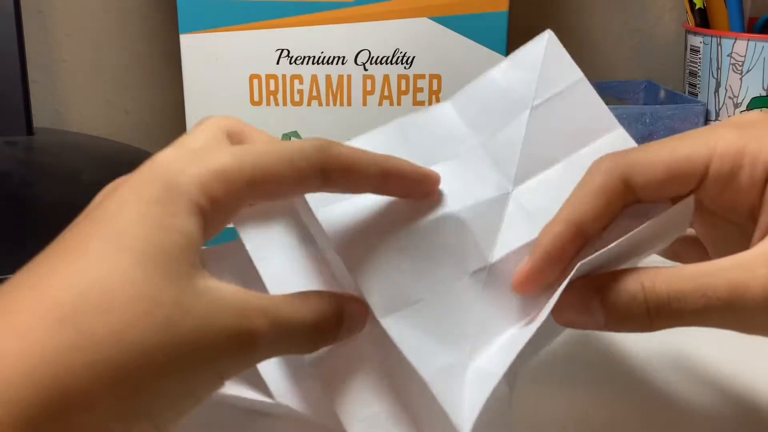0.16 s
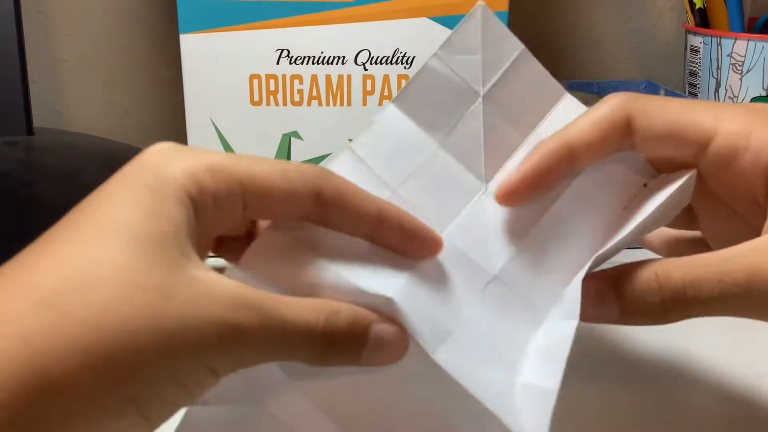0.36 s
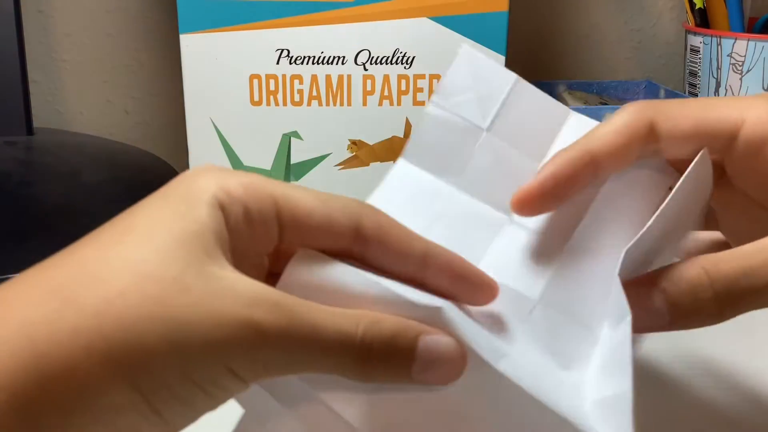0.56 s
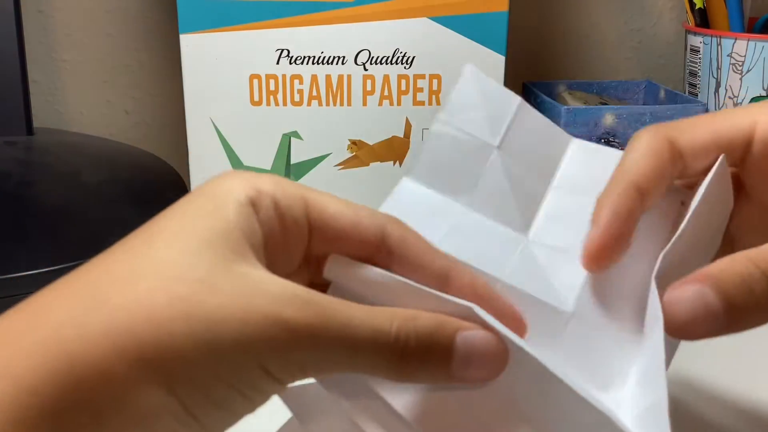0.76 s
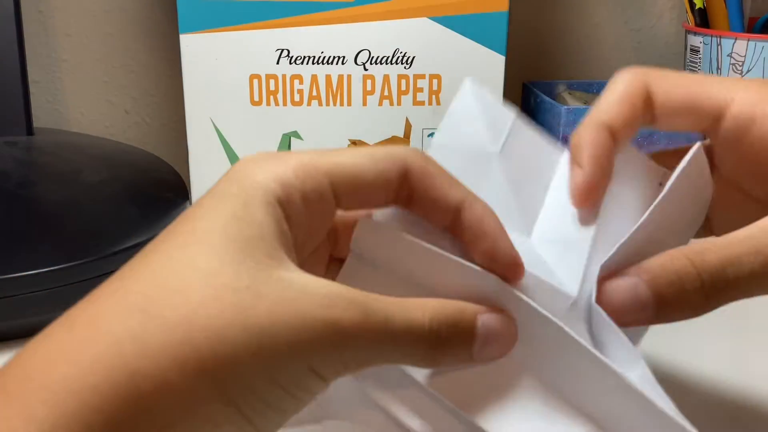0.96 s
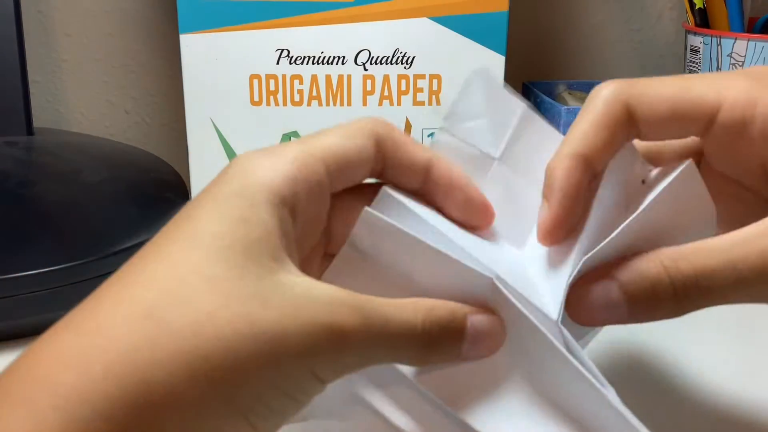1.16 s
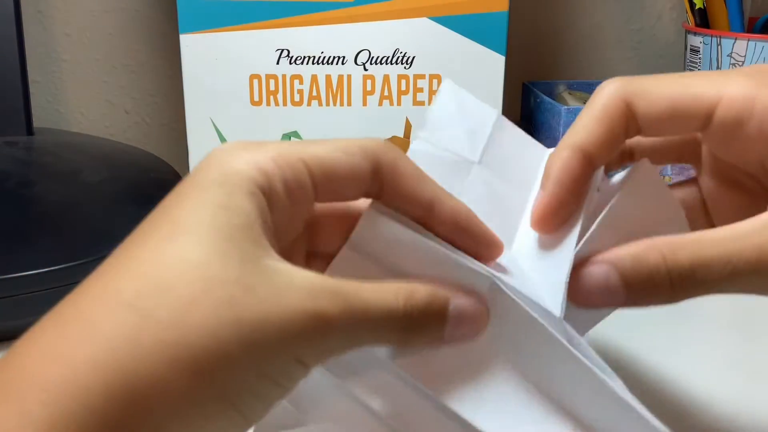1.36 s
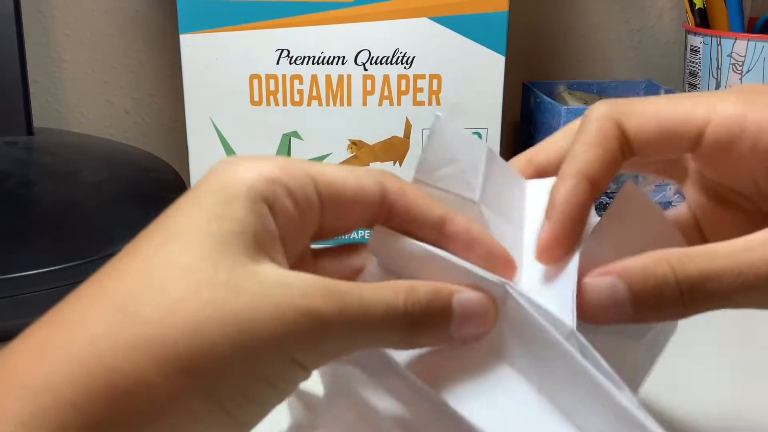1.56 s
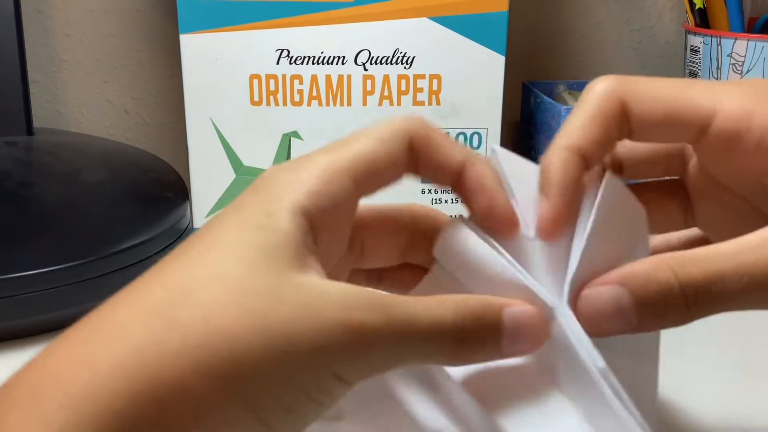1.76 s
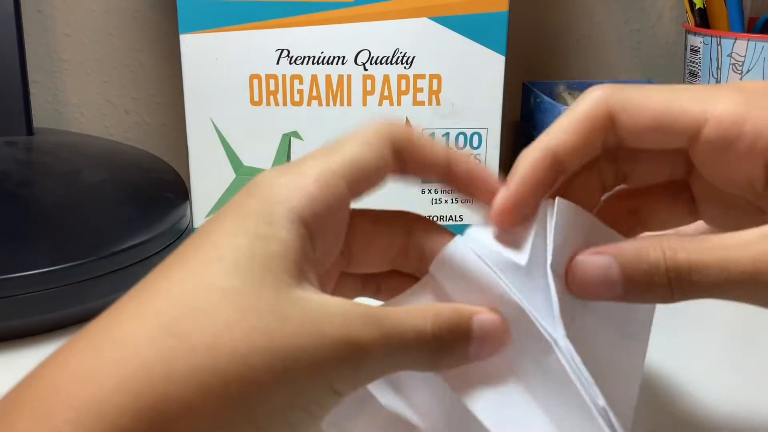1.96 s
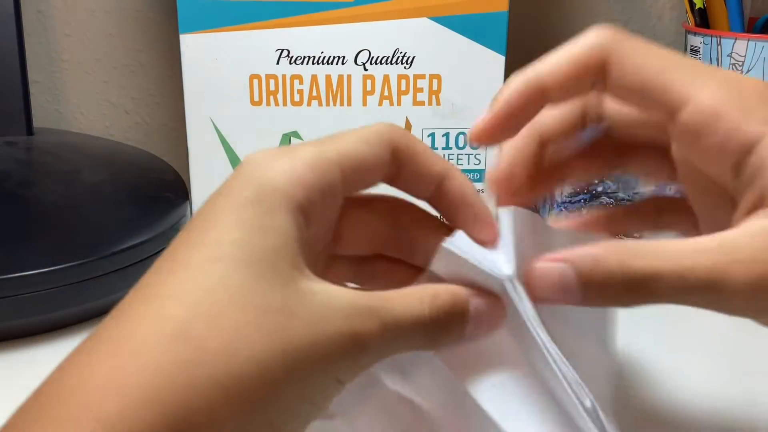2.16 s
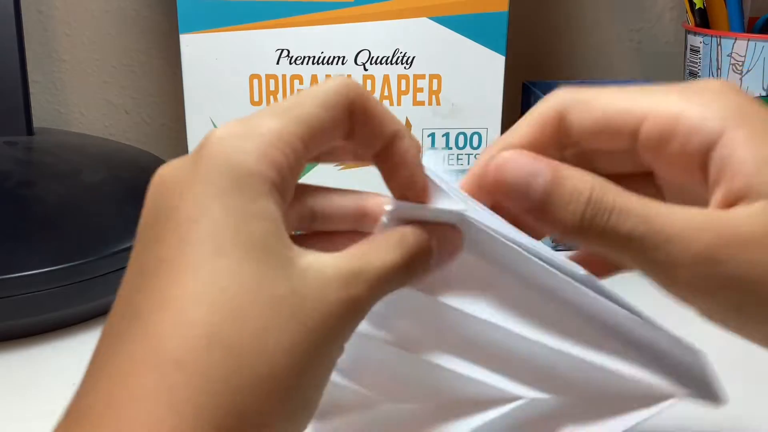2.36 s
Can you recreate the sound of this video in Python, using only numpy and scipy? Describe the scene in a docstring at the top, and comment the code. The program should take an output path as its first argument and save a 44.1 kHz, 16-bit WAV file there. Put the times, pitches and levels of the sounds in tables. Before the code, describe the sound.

Stiff paper is folded close to the microphone in a small quiet room. Rustles and a light snap open it; sharp pops come at 0.3 and 0.7 seconds with soft hollow knocks. Light crackles follow, a weaker pop at 1.3, then dense crease snaps from 1.4 to 1.8 with faint low thuds. Sparser snaps, a crisp scrape near 2.2 and short rustles end it over faint wavering hum.

```python
"""At a desk in a small room, two hands collapse a creased sheet of stiff paper into a fold, heard close by.
Panels buckle with a pop, two strong and one weak, and creases snap: noise bursts plus damped modes.
Fingers and paper layers slide in short rustles and scrapes: random impulses through resonances.
The sheet knocks softly in low modes, and the hands thud on the desk in bursts of low noise.
The room answers with decaying noise, over steady air noise and a faint wavering hum."""
import sys
import numpy as np
from scipy import signal
from scipy.fft import rfft, irfft
from scipy.io import wavfile
from scipy.ndimage import uniform_filter1d, map_coordinates

SR = 44100
rng = np.random.default_rng(int(sys.argv[2]) if len(sys.argv) > 2 else 0)


def wav_record(signal):
    """Record a signal, one row per channel, as 16-bit PCM in the file named by sys.argv[1]."""
    frames = np.transpose(np.atleast_2d(signal))
    bounded = np.clip(frames, -1, 1)
    # unit amplitude maps onto the largest positive 16-bit level
    quanta = np.round(bounded * 32767).astype(np.int16)
    wavfile.write(sys.argv[1], SR, quanta)


N = 110250  # length [samples]

# The four registers of the sheet: body, mid, crisp, air; columns (low edge [Hz], high edge [Hz])
BANDS = [(150, 700), (700, 2600), (2600, 6500), (6500, 16000)]
REFERENCE_S = .01  # the level of a short sound is its energy spread over this time


def undb(db):
    """Logarithmic level: decibels to amplitude gain."""
    return 10 ** (np.asarray(db) / 20)


def unit(x):
    """Mean-square normalisation: scale to rms 1."""
    return x / np.sqrt(np.mean(x ** 2) + 1e-20)


def blow(x, db):
    """Energy equivalence: give a short sound the energy of level db held for REFERENCE_S."""
    return x * undb(db) * np.sqrt(REFERENCE_S * SR / (np.sum(x ** 2) + 1e-20))


def add(out, s, x):
    """Superposition: mix x into out at time s."""
    i = min(max(int(s * SR), 0), N)
    out[i:i + len(x)] += x[:N - i]


def band(x, edges, order=3):
    """Causal band-pass filtering between two edges."""
    return signal.sosfilt(signal.butter(order, edges, "band", fs=SR, output="sos"), x)


def walk(rate):
    """Low-pass random process: a smooth wander with spread near 1, renewed rate times a second."""
    k = max(int(SR / rate), 1)
    steps = np.repeat(rng.standard_normal(N)[:N // k + 1], k)
    smooth = uniform_filter1d(uniform_filter1d(steps, k), k)
    return 1.11 * smooth[:N]


def ring(hz, decay, size=4096):
    """Free vibration of one damped mode: a sine under an exponential decay."""
    t = np.arange(size) / SR
    return np.sin(2 * np.pi * hz * t) * np.exp(-t / decay)


def sheet(x, direct_db=-4):
    """Modal superposition: a force drives the parallel resonances of the folded sheet over the desk."""
    # Columns (frequency [Hz], bandwidth [Hz], level [dB])
    modes = [(374, 94, -12.5), (645, 51, 1), (1060, 143, 7), (1344, 82, 8.5), (2054, 460, 6),
             (2980, 1860, 0), (5170, 560, 0), (5630, 120, -6), (7430, 210, -18), (9730, 2800, -26)]
    rings = sum(undb(db) * signal.lfilter(*signal.iirpeak(hz, hz / width, fs=SR), x)
                for hz, width, db in modes)
    return rings + undb(direct_db) * x


def dull(x, hz):
    """Finite release time: the force runs out of treble above hz."""
    return signal.sosfilt(signal.butter(2, hz, fs=SR, output="sos"), x)


def crack(levels, shape, dull_hz, tick=2.0, size=4096):
    """Impulsive release: a tick, then bending waves scattered between the folds, as decaying noise."""
    t, out = np.arange(size) / SR, np.zeros(size)
    for edges, db, (decay, lag) in zip(BANDS, levels, shape):
        force = rng.standard_normal(size) * np.exp(-t / decay) * (1 - np.exp(-t / lag))
        force[0] += tick
        out += blow(band(sheet(dull(force, dull_hz)), edges), db)
    return out


def lead_in(x, yield_s=.0013, yield_db=-14, size=256):
    """Progressive yielding: swelling fibre crackle ahead of a release; returns sound and lead [s]."""
    swell = np.exp((np.arange(size) - size) / SR / yield_s)
    tear = signal.fftconvolve(rng.standard_normal(size) * swell, x[:size])
    out = np.concatenate([np.zeros(size), x])
    out[:len(tear)] += tear * undb(yield_db) * np.sqrt(np.sum(x ** 2) / np.sum(tear ** 2))
    return out, size / SR


def pops(lower=0.724, lower_db=-4, dull_hz=9300):
    """Snap-through buckling: a panel cracks and flips; two panel modes and the crease ring briefly."""
    # Panels that pop through, columns (time [s], panel pitch [Hz], panel ring [dB], crease ring [dB],
    # body [dB], mid [dB], crisp [dB], air [dB])
    panels = [(0.3215, 1910, -30.5, -31.5, -35, -19.5, -26.5, -26),
              (0.682, 2576, -23.5, -25.5, -41, -35.5, -30.5, -30.5),
              (1.3284, 1900, -42, -70, -42, -29, -41.5, -72)]
    # Noise envelope in each register, columns (decay [s], rise lag [s])
    shape = [(0.012, 0.0011), (0.001, 0.00032), (0.0026, 0.0012), (0.0014, 0.000047)]
    panel_decay_s, crease_hz, crease_decay_s = 0.0014, 6020, 0.0018
    out = np.zeros(N)
    for s, hz, panel_db, crease_db, *levels in panels:
        upper_mode = ring(hz, panel_decay_s)
        lower_mode = undb(lower_db) * ring(hz * lower, panel_decay_s)
        panel = blow(upper_mode - lower_mode, panel_db)
        crease = blow(ring(crease_hz, crease_decay_s), crease_db)
        x, lead = lead_in(crack(levels, shape, dull_hz) + panel + crease)
        add(out, s - lead, x)
    return out


def snaps(facet_db=-1.5, facet_cycles=3.2, dull_hz=12600, trim_db=-1):
    """Impulse excitation: each crease that gives way sets the facet beside it ringing a few cycles."""
    # Creases that give way, levels before the trim, columns (time [s], facet pitch [Hz],
    # body [dB], mid [dB], crisp [dB], air [dB])
    creases = [(0.099, 1530, -35, -32, -43.5, -62), (0.2701, 2140, -43, -45, -52, -61),
               (0.731, 480, -43, -55, -50, -52), (0.8527, 665, -49.5, -49.5, -53, -66),
               (0.8995, 629, -45, -44, -52, -46), (0.9361, 616, -44, -55, -48, -49),
               (1.1001, 1190, -49, -38, -42.5, -68), (1.1268, 400, -38.5, -39, -42, -48.5),
               (1.1742, 3370, -50, -40, -37.5, -55), (1.242, 598, -45.5, -47.5, -44, -51.5),
               (1.3922, 2130, -52, -40.5, -42, -61), (1.406, 610, -41, -45, -56, -51),
               (1.4462, 1320, -34.5, -36.5, -36, -50), (1.5168, 990, -37, -44.5, -58, -62),
               (1.5615, 1360, -47, -44.5, -42.5, -49.5), (1.587, 3220, -44.5, -46, -45.5, -50.5),
               (1.6184, 2200, -62, -45, -42.5, -47), (1.635, 2210, -39, -33.5, -39, -44.5),
               (1.6437, 960, -47, -45, -40, -45.5), (1.6762, 1270, -36.5, -36, -47, -48),
               (1.6896, 2370, -44, -39, -46, -39.5), (1.7876, 1290, -35.5, -35.5, -41.5, -64),
               (1.9476, 3150, -43, -43.5, -42, -50), (1.97, 1300, -40, -43.5, -47, -60),
               (1.9822, 1095, -49, -42.5, -60, -61), (2.0304, 545, -34, -41, -50, -61),
               (2.3804, 1010, -42, -42, -40.5, -45), (2.474, 950, -52, -44.5, -48, -55),
               (2.4926, 402, -39.5, -44, -45, -46)]
    # Noise envelope in each register, columns (decay [s], rise lag [s])
    shape = [(0.0065, 0.00022), (0.0033, 0.0017), (0.0043, 0.00008), (0.0043, 0.000043)]
    out, centres = np.zeros(N), np.log(BANDS).mean(axis=1)
    for s, hz, *levels in creases:
        # the facet's level follows the crack's level at the facet's pitch
        level = np.interp(np.log(hz), centres, levels) + facet_db
        facet = blow(ring(hz, facet_cycles / hz), level)
        x, lead = lead_in(crack(levels, shape, dull_hz) + facet)
        add(out, s - lead, x)
    return out * undb(trim_db)


def catches(rate, spread_db):
    """Random point process: tiny impulses of either sign and uneven size, rate per second."""
    hits = rng.random(N) < rate / SR
    signs = rng.choice([-1, 1], N)
    sizes = undb(spread_db * np.clip(rng.standard_normal(N), -2, 2))
    return unit(hits * signs * sizes)


def flex(x, shift=.04, rate=14):
    """Frequency modulation by time warping: bending slides the resonances up and down."""
    bend = walk(rate)
    position = np.cumsum(1 + shift * (bend - bend.mean()))
    return map_coordinates(x, [position], order=5, mode="mirror")


def bounce(x, delay_s=.0006, swing=.3, share=.35, rate=9):
    """Comb interference: a reflection off the desk, its path changing as the sheet moves, shifts the colour of
    the rustle."""
    late = np.arange(N) - SR * delay_s * np.exp(swing * walk(rate))
    return (x + share * map_coordinates(x, [late], order=3)) / np.hypot(1, share)


def rustle(grip_db=1.1, grip_rate=130, flicker_db=2.46, trim_db=-1.5, size=600):
    """Stick-slip friction: fibres catch under an uneven grip, stiff ones break, tiny crinkles scatter."""
    # Fingers and layers sliding, levels before the trim, columns (start [s], end [s], swell [s],
    # body [dB], mid [dB], crisp [dB], air [dB])
    rubs = [(0, .003, .001, -41.5, -42, -52.5, -63), (0.063,0.129,0.0022,-55,-57,-61,-60.5),
            (0.138,0.152,0.017,-44,-35.5,-47,-51.5), (.188,0.267,0.011,-41.5,-39.5,-51,-54.5),
            (0.267,0.332,.008,-43.5,-49.5,-50,-56), (0.32,0.41,0.0065,-68,-63,-55,-62.5),
            (.45,.55,.08,-53,-51.5,-44.5,-53), (0.54,0.708,.015,-56,-54,-48,-54),
            (0.685,0.798,0.0077,-52.5,-50,-51,-57), (0.85,0.944,0.047,-53.5,-49,-50.5,-57.5),
            (0.949,1.062,0.013,-54.5,-48.5,-49.5,-52.5), (1.174,1.205,0.0056,-53,-50.5,-51.5,-57),
            (1.222,1.313,0.025,-46.5,-48,-53,-55), (1.318,1.463,0.014,-56.5,-48,-48,-52.5),
            (1.436,1.62,0.02,-63,-58.5,-54.5,-60.5), (1.627,1.728,0.0092,-49,-52.5,-47,-53),
            (1.707,1.819,0.0067,-64,-53.5,-55,-55), (1.775,1.877,0.0097,-54.5,-50.5,-49,-52.5),
            (1.864,1.963,0.0091,-72,-58,-55,-60), (1.959,2.025,.006,-55.5,-51.5,-50,-54.5),
            (2.067,2.178,0.027,-57.5,-53.5,-49.5,-53), (2.2,2.234,0.01,-47,-46.5,-41.5,-51.5),
            (2.28,2.372,0.066,-48,-47.5,-47.5,-49), (2.4,2.448,.01,-54,-55,-51.5,-59)]
    fibres_per_s, crackles_per_s, crackle_db = 9000, 110, -7.5
    crinkles_per_s, crinkle_db, crinkle_s, release_s = 150, -6, .0014, 0.0071
    t, out = np.arange(N) / SR, np.zeros(N)
    crackles = undb(crackle_db) * catches(crackles_per_s, spread_db=1)
    fibres = catches(fibres_per_s, spread_db=1.5) + crackles
    grip = undb(grip_db * walk(grip_rate))
    strokes = [np.clip((t - start) / swell, 0, 1) * np.exp(-np.maximum(t - end, 0) / release_s)
               for start, end, swell, *_ in rubs]
    for k, edges in enumerate(BANDS):
        # each register has crinkles of its own
        scatter = rng.standard_normal(size) * np.exp(-np.arange(size) / SR / crinkle_s)
        crinkles = unit(signal.fftconvolve(catches(crinkles_per_s, spread_db=1.5), scatter)[:N])
        friction = flex(sheet(fibres + undb(crinkle_db) * crinkles)) * grip
        # where rubs overlap, the stronger one counts
        pressure = np.max([stroke * undb(row[3 + k]) for stroke, row in zip(strokes, rubs)], axis=0)
        out += unit(band(friction, edges)) * pressure * undb(flicker_db * walk(60))
    return bounce(out) * undb(trim_db)


def scrapes(slips_per_s=2200, edge_q=7, grit_share=.16):
    """Stick-slip excitation of a resonance: an edge scrapes in a grainy burst at its own pitch."""
    # Edges that catch and scrape over the sheet, columns (start [s], length [s], pitch [Hz], level [dB])
    edges = [(1.28, 0.04, 5250, -46.5), (1.33, .022, 5300, -54), (1.682, 0.021, 2540, -42.5),
             (2.108, 0.04, 12900, -49), (2.206, 0.018, 3360, -38), (2.206, .02, 5600, -38.5),
             (2.323, 0.01, 5560, -41.5), (2.345, 0.01, 5940, -39)]
    out, t = np.zeros(N), np.arange(N) / SR
    slips = catches(slips_per_s, spread_db=1.0)
    grit = unit(band(slips, (BANDS[2][0], BANDS[3][1])))  # bare ticks in the crisp and air registers
    for s, length, hz, db in edges:
        edge = unit(signal.lfilter(*signal.iirpeak(hz, edge_q, fs=SR), slips))
        stroke = np.sin(np.pi * np.clip((t - s) / length, 0, 1))
        out += (edge + grit_share * grit) * stroke * undb(db)
    return out


def flaps(upper=1.5, upper_db=-6, attack_s=0.0016, flutter=.1, size=4096):
    """Damped modes of varying stiffness: the sheet knocks in two low modes whose pitch flutters."""
    # Soft hollow knocks of the whole sheet, columns (time [s], mean pitch [Hz], level [dB], decay [s])
    knocks = [(.023, 601, -43, 0.009), (0.324, 312, -36.5, .009), (.692, 572, -38, 0.013),
              (0.695, 310, -43, .011), (1.172, 287, -46, 0.008), (1.024, 233, -46, 0.0119),
              (1.597, 310, -50, 0.0071), (2.161, 255, -48, 0.0057)]
    out, t = np.zeros(N), np.arange(size) / SR
    for s, hz, db, decay in knocks:
        swing = flutter * walk(1 / decay)[size:2 * size]
        phase = 2 * np.pi * np.cumsum(hz * (1 + swing)) / SR
        modes = np.sin(phase) + undb(upper_db) * np.sin(upper * phase)
        envelope = np.exp(-t / decay) * (1 - np.exp(-t / attack_s))
        add(out, s, blow(modes * envelope, db))
    return out


def thuds(edges_hz=(58, 163), decay_s=0.02, size=8192):
    """Damped low-frequency impact: the hands press down through the paper onto the desk."""
    # Columns (time [s], level [dB])
    presses = [(0.324, -44), (0.716, -55), (1.137, -50), (1.629, -49), (1.667, -44.5)]
    out, t = np.zeros(N), np.arange(size) / SR
    for s, db in presses:
        force = rng.standard_normal(size) * np.exp(-t / decay_s)
        add(out, s, blow(band(force, edges_hz, order=2), db))
    return out


def room(x, onset_s=0.00077, size=22050):
    """Diffuse reverberation: desk and near walls answer with exponentially decaying noise."""
    # One row for each register, columns (time to decay by 60 dB [s], level [dB])
    decays = [(0.9, -28), (0.59, -24), (0.56, -18.5), (0.26, -12.5)]
    t = np.arange(size) / SR
    tail = 0
    for edges, (t60, db) in zip(BANDS, decays):
        envelope = np.exp(-np.log(1000) * t / t60) * (1 - np.exp(-(t / onset_s) ** 2))
        h = band(rng.standard_normal(size), edges) * envelope
        tail = tail + undb(db) * h / np.sqrt(np.sum(h ** 2))
    return signal.fftconvolve(x, tail)[:N]


def room_tone(air_db=-57.5, hum_db=-60.5, hum_hz=117.7, drift=.035, waver_db=2.0):
    """Stationary background: spectrally shaped air noise and a hum wavering in pitch and level."""
    # Spectrum of the air noise, columns (frequency [Hz], relative density [dB per Hz])
    spectrum = [(25, -12), (42, -21), (58, -2), (100, -1.5), (170, -2.5), (300, -14.5), (700, -8.5),
                (2000, -21), (6000, -29), (16000, -31)]
    hz, db = np.array(spectrum).T
    f = np.maximum(np.arange(N // 2 + 1) * SR / N, 1)
    gain = undb(np.interp(np.log(f), np.log(hz), db))
    air = irfft(rfft(rng.standard_normal(N)) * gain, N)
    phase = 2 * np.pi * np.cumsum(hum_hz * (1 + drift * walk(13.0))) / SR
    hum = np.sin(phase) * undb(waver_db * walk(9.6))
    return undb(air_db) * unit(air) + undb(hum_db) * unit(hum)


def scene(pop_room_db=-8):
    """Superposition of direct sound, reverberation and background."""
    folding = rustle() + scrapes() + flaps() + snaps() + thuds()
    popping = pops()
    # the pops face the microphone and reach the room less
    echoes = room(folding + undb(pop_room_db) * popping)
    return (folding + popping + echoes + room_tone())[None]


def record(dry, low_cut_hz=53, top_hz=15900):
    """Band limitation: the recorder cuts the deep bass and the top."""
    thin = signal.sosfilt(signal.butter(4, low_cut_hz, "high", fs=SR, output="sos"), dry)
    return signal.sosfilt(signal.ellip(10, .2, 70, top_hz, fs=SR, output="sos"), thin)


dry = scene()
out = record(dry)
wav_record(out)
```